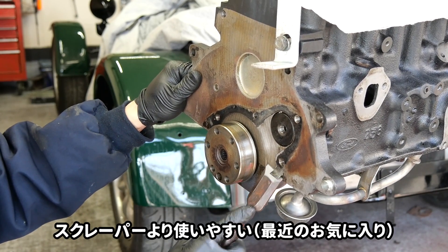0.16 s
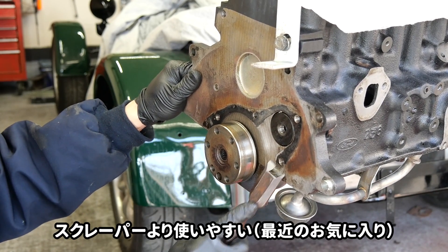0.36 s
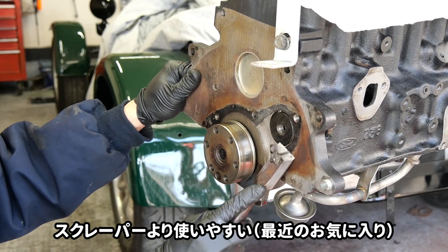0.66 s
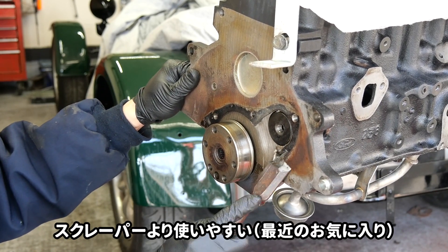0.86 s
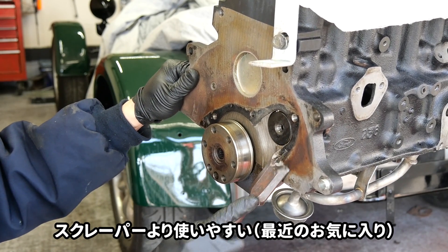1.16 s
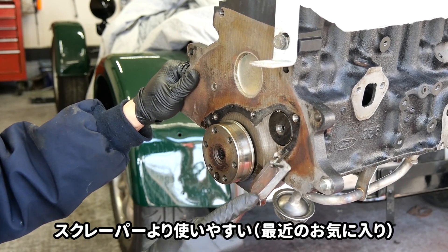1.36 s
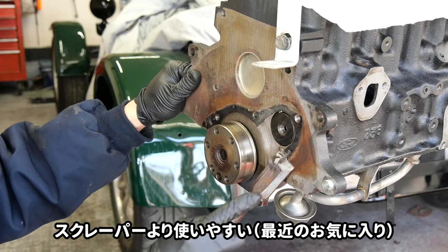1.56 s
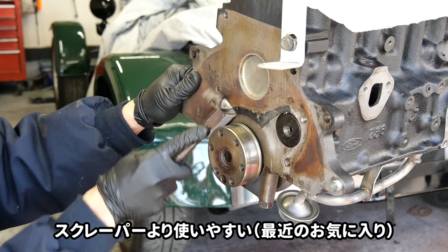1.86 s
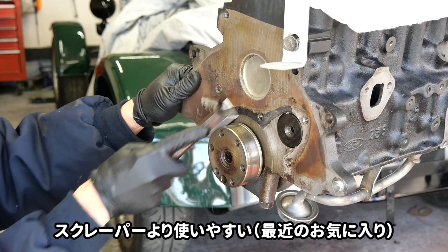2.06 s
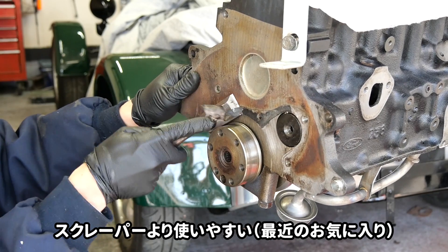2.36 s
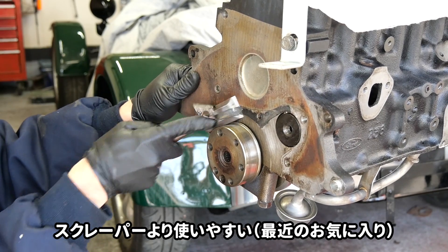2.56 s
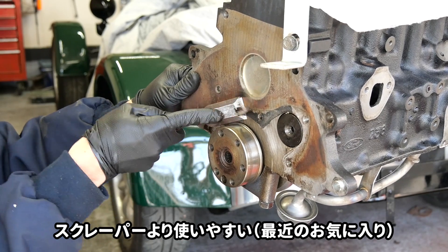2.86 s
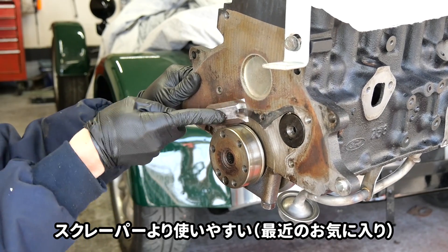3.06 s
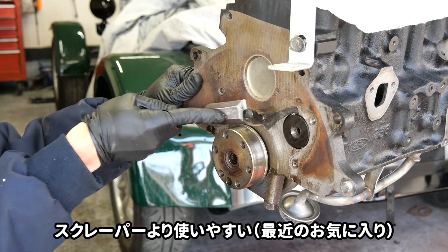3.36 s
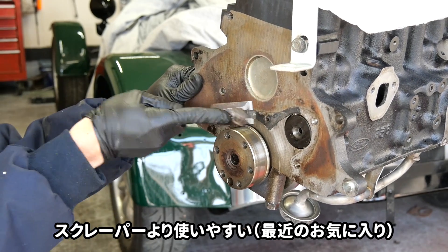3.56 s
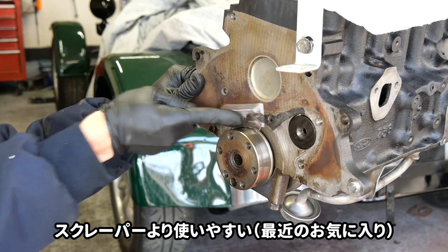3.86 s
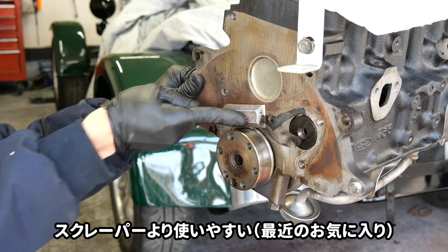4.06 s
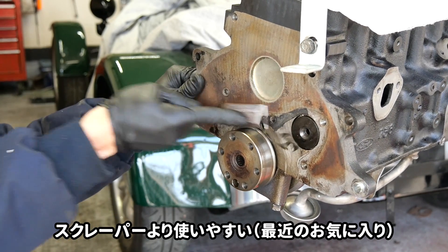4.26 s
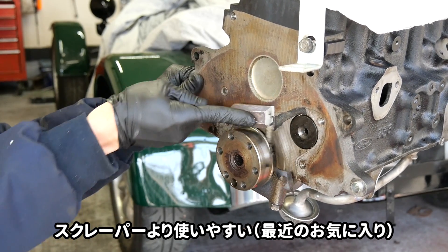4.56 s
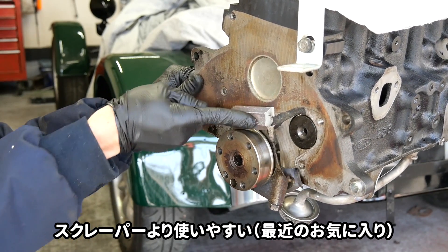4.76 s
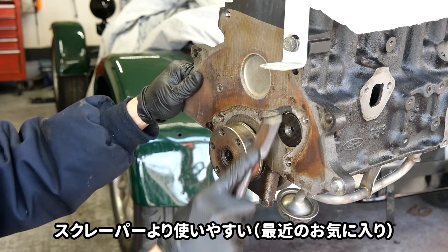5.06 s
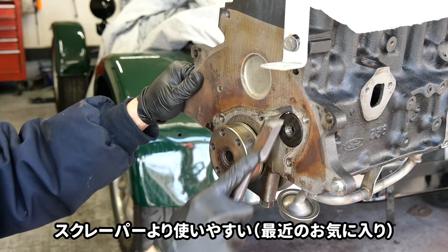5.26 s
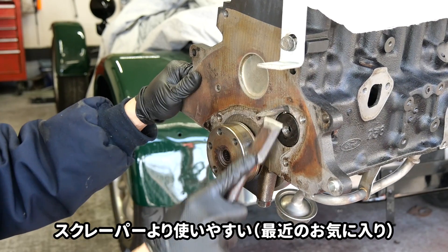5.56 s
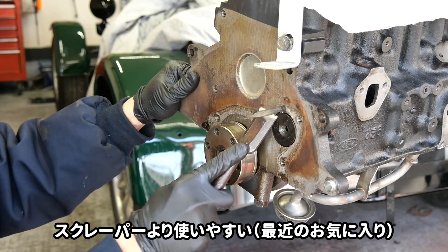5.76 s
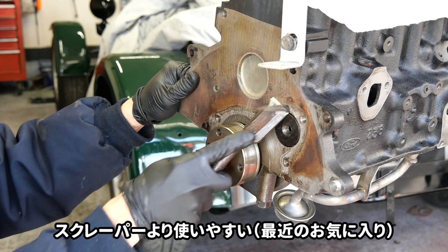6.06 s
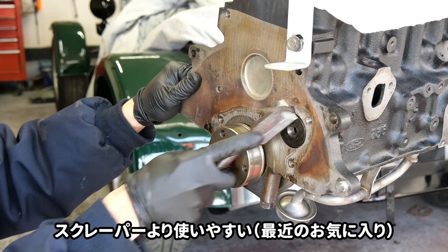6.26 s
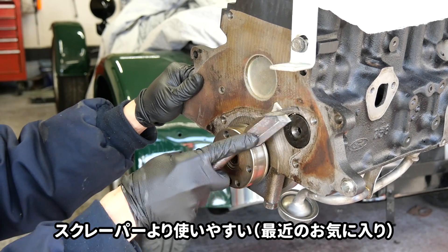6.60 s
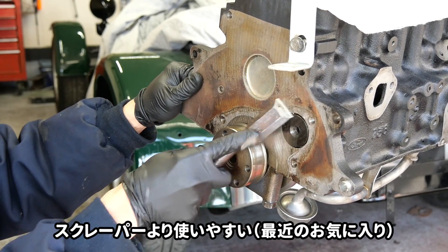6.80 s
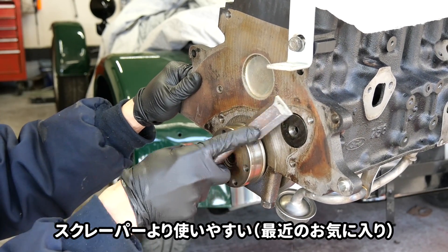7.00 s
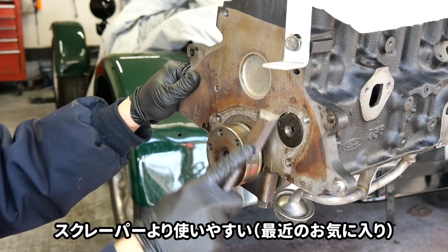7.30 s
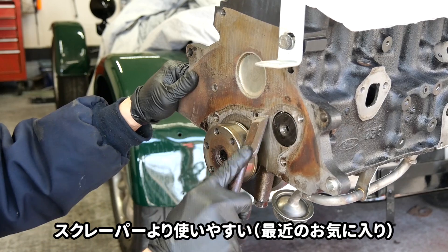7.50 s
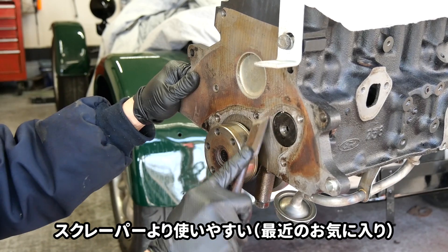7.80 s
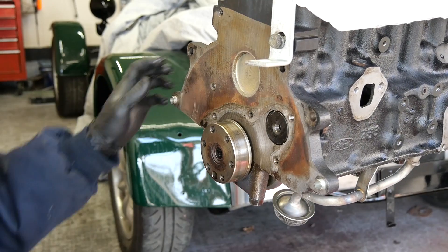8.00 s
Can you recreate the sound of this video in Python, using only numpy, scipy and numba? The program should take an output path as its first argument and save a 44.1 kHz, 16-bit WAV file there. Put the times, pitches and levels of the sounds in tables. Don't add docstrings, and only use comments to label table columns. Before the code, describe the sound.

Close, gritty metal scraping in fast uneven strokes, the steel blade ringing drily and clacking on ridges, in a workshop with faint road noise.

```python
import sys
import numpy as np
from scipy import signal
from scipy.io import wavfile
from scipy.ndimage import uniform_filter1d
from numba import njit

SR = 44100
rng = np.random.default_rng(int(sys.argv[2]) if len(sys.argv) > 2 else 0)


def materialize(psi):
    bounded = np.clip(np.atleast_2d(psi).T, -1, 1)
    quanta = np.round(bounded * 32767).astype(np.int16)
    wavfile.write(sys.argv[1], SR, quanta)


def gain_from_db(level_db):
    decades = np.asarray(level_db, float) / 20
    return 10 ** decades


N = 358797
T = np.arange(N) / SR

# time in seconds, level in dB.
ROAD_LEVEL = [
    (0.0, -46.3),
    (1.72, -46),
    (1.9, -51.5),
    (4.44, -52),
    (4.87, -53),
    (5.55, -50),
    (5.91, -51.5),
    (7.02, -50.5),
    (7.75, -53),
    (8.14, -44.5),
]
# frequency in Hz, density in dB per Hz.
ROAD_SPECTRUM = [(30, -36), (50, -22.5), (70, -26.5), (120, -23), (230, -16.5), (600, -12.5), (720, -9.5),
                 (900, -2), (1150, -17), (1700, -16), (3300, -18.5), (7000, -30), (12000, -37),
                 (16000, -50)]
# time in seconds, level in dB.
MOTOR_LEVEL = [
    (0, -82),
    (5.0, -80),
    (5.35, -64.5),
    (6.0, -66),
    (7.0, -69),
    (7.6, -70),
    (8.1, -74),
]
# time in seconds, peak in dB, centre in Hz, ring in dB over the peak.
FLAKES = [(0.0578, -37, 8200, -10), (0.161, -38, 12300, -14), (0.3481, -33, 9350, -12),
          (0.5506, -36.5, 10100, -9), (0.6519, -31, 11800, -22), (1.5805, -32.5, 9200, -12),
          (1.727, -30, 8150, -20), (2.355, -40, 10100, -12.5), (3.8262, -40, 12600, -18),
          (4.5121, -47, 9280, -8), (4.7331, -45, 9270, -17), (4.8883, -44, 10200, -17),
          (5.008, -42, 9160, -18), (5.1766, -38, 12400, -22), (5.1991, -40, 9300, -10),
          (5.3996, -40, 10100, -6), (5.4789, -45, 12100, -12), (5.6047, -46, 9400, -8),
          (6.6024, -38, 9330, -13), (6.9162, -51, 12000, -18), (7.6765, -47, 9200, -18),
          (7.8481, -47, 10200, -18)]
# time in seconds, peak in dB, blade mode in Hz.
CATCHES = [(0.0691, -21, 3640), (0.2602, -17, 3570), (0.4533, -20, 3600), (0.615, -21, 3670),
           (0.812, -19, 3260), (0.8424, -22, 3240), (1.0305, -21, 3500), (1.2455, -23, 3510),
           (1.4645, -23, 3460), (1.5139, -21, 3410), (2.6208, -20, 3380), (2.7515, -19, 3380),
           (2.7665, -16, 3550), (2.8418, -14, 3460), (2.8468, -11, 3560), (2.8724, -9, 3410),
           (3.0628, -23, 3360), (3.5053, -19, 3650), (3.5208, -15, 3810), (3.8366, -20, 3590),
           (3.9603, -18, 3500), (4.0441, -22, 3610), (4.2486, -20, 3640), (4.2837, -18, 3120),
           (5.3004, -18, 3240), (5.3622, -24, 3260), (5.5214, -19, 3280), (5.5334, -21, 3480),
           (7.2674, -28, 2990), (7.3018, -27, 2910), (7.3934, -21, 3250), (7.5677, -24, 3360),
           (7.7622, -27, 3460)]
# time in seconds, peak in dB, centre in Hz, ting in dB.
KNOCKS = [(0.6873, -18, 3430, -26), (0.9218, -24, 3640, -30), (1.1378, -14, 3430, -31),
          (1.3314, -17, 3300, -29), (1.7459, -17, 3290, -26), (1.8267, -22, 3570, -35),
          (1.8896, -6, 3630, -37), (2.1465, -10, 2700, -29), (2.9746, -20, 3460, -38),
          (3.1822, -22, 3850, -32), (3.2954, -6, 4080, -21), (3.7125, -12, 3850, -34),
          (3.9315, -3, 4010, -22), (4.141, -14, 3890, -30), (4.3355, -3, 3760, -18),
          (4.5391, -13, 3780, -30), (4.7501, -18, 3820, -33), (5.0789, -18, 3310, -36),
          (5.2579, -31, 3400, -24), (5.2879, -7, 3220, -38), (5.5578, -12, 3290, -41),
          (5.689, -11, 2990, -40), (6.346, -16, 4280, -28), (6.548, -9, 4250, -38),
          (6.7361, -11, 3290, -36), (6.9361, -17, 3470, -29), (7.0184, -22, 3530, -27),
          (7.3664, -21, 3220, -29), (7.3741, -10, 2930, -34), (7.4784, -18, 3900, -47)]
# time in seconds, peak in dB, pitch as a ratio.
TAPS = [(1.89, -30, 1.1), (2.148, -27, 1.03), (2.646, -32, 1.05), (3.294, -34.5, 0.96), (4.283, -29, 1.5),
        (4.335, -36, 0.9), (4.481, -33, 1.5), (4.54, -30.5, 1.06), (4.749, -32, 0.97), (5.079, -29, 1.04),
        (5.287, -20.5, 1.02), (5.559, -25, 1.05), (5.689, -36, 1.09), (6.547, -34, 0.96),
        (6.738, -34, 0.97), (7.375, -34, 0.98), (7.479, -29, 1.02)]
# time in seconds, peak in dB.
JOLTS = [
    (3.714, -43),
    (3.932, -35.5),
    (4.336, -36),
    (5.289, -42),
]
# frequency in Hz, width in Hz, level in dB.
CASTING = [(832, 120, 5.5), (1027, 86, 6.5), (1170, 400, -4), (1440, 250, 2)]
# frequency in Hz, width in Hz, level in dB.
EDGE = [(6400, 600, -1), (8050, 600, -5.5), (9300, 400, -10), (9280, 50, -15), (11420, 70, -17),
        (12120, 90, -13), (10400, 1000, -11), (11500, 800, -9), (12200, 1100, -2.5), (13300, 1200, -8),
        (14700, 1800, -15), (7500, 5000, -7)]
# multiple of the blade mode as a ratio, width in Hz, level in dB.
BLADE = [(1, 283, 8.5), (.96, 160, -8), (1.07, 120, -3.5), (.83, 370, -10.5), (1.2, 267, -3.5),
         (1.1, 2740, -9.5)]
# time in seconds, blade mode in Hz, shank mode in Hz.
GRIP = [
    [(0.0, 3620, 1700), (0.444, 3650, 1770), (0.798, 3320, 1460), (0.938, 3390, 1610), (1.026, 3470, 1470),
     (1.14, 3420, 1680), (1.352, 3430, 1600), (1.95, 3530, 1720)],
    [(1.96, 3600, 1670), (2.028, 3350, 1520), (2.168, 3600, 1620), (2.274, 3440, 1550), (2.834, 3480, 1520),
     (2.964, 3470, 1580), (3.024, 3360, 1460), (3.15, 3440, 1600)],
    [(3.16, 3650, 1710), (3.216, 3390, 1590), (3.306, 3790, 1850), (3.408, 3490, 1570), (3.732, 3810, 1750),
     (3.872, 3590, 1560), (3.95, 3780, 1780), (4.1, 3520, 1510)],
    [(4.11, 3660, 1520), (4.166, 3760, 1690), (4.292, 3340, 1500), (4.322, 3770, 1560), (4.386, 3430, 1680),
     (4.486, 3620, 1500), (4.756, 3620, 1620), (4.9, 3380, 1540)],
    [(4.95, 3410, 1540), (5.074, 3220, 1510), (5.186, 3580, 1680), (5.294, 3270, 1560), (5.382, 3570, 1770),
     (5.862, 3260, 1530), (5.906, 3520, 1810), (6.1, 3620, 1670)],
    [(6.11, 3600, 1760), (6.258, 3180, 1420), (6.324, 3550, 1760), (6.488, 3370, 1490), (6.518, 3170, 1710),
     (6.592, 3420, 1680), (7.066, 3430, 1570), (7.2, 3570, 1610)],
    [(7.21, 3160, 1560), (7.226, 2960, 1530), (7.394, 3010, 1770), (7.442, 3210, 1470), (7.472, 3490, 1610),
     (7.746, 3480, 1580), (7.9, 3460, 1740), (8.1, 3380, 1520)],
]
# time in seconds, then bite, casting contact, shank
# and edge hiss, all in dB.
ANGLE = [(0.0, -18, -23, -10.5, -16), (0.45, -11, -14.5, -8, -9), (0.7, -19, -14, -11, -15),
         (0.95, -21, -12.5, -11, -15.5), (1.5, -19, -15, -12, -13), (1.87, -22, -21, -16, -21),
         (2.1, -13.5, -10.5, -10, -14), (2.6, -18, -12.5, -6, -14), (2.86, -17, -12, -6, -12),
         (3.1, -21, -15, -12, -20), (3.3, -10.5, -11, -8.5, -17), (3.75, -19, -12, -8.5, -13),
         (4.2, -17, -16.5, -12, -13.5), (4.8, -20, -12, -12, -15), (5.3, -11.5, -8, -14.5, -13),
         (5.4, -4.5, -8.5, -11.5, -11.5), (5.55, -15, -13.5, -14, -14), (5.8, -15, -11.5, -16, -21),
         (5.94, -4, -15.5, -11, -17), (6.25, -8, -10, -8, -16), (6.45, -9.5, -10, -8, -13),
         (6.75, -13, -15, -7, -18.5), (7.0, -17, -14, -8, -21), (7.14, -13, -10, -6.5, -15),
         (7.24, -20.5, -22, -19.5, -20), (7.9, -27, -23, -20, -23), (8.1, -4, -10, -16, -11)]
# peak time in
# seconds, force in dB, rise in ms, fall in ms.
STROKES = [(0.014, -35.5, 33, 15), (0.074, -27.5, 9.6, 7.9), (0.203, -30.5, 26, 32),
           (0.274, -26.5, 15, 16), (0.402, -41.0, 29, 14), (0.458, -34.5, 11.6, 38),
           (0.619, -32.5, 14, 9.8), (0.692, -29.5, 19, 34), (0.836, -29.0, 25, 13.4),
           (0.927, -28.5, 9.2, 14.6), (1.036, -31.0, 13, 14.4), (1.145, -26.0, 17.3, 11.5),
           (1.256, -29.5, 15.5, 12.7), (1.335, -24.0, 11, 21), (1.537, -32.0, 21, 17),
           (1.649, -32.0, 18, 29), (1.741, -26.0, 29, 15), (1.833, -23.5, 7.6, 27),
           (1.892, -24.0, 10, 45),
           (2.06, -33.0, 37, 22), (2.152, -33.0, 25, 36), (2.269, -35.0, 31, 44), (2.396, -37.0, 47, 25),
           (2.534, -35.0, 51, 24), (2.644, -31.0, 33, 17.6), (3.077, -31.5, 17, 14), (3.22, -30.0, 31, 33),
           (3.296, -29.0, 18, 34), (3.436, -34.0, 26, 19), (3.516, -27.0, 18, 13.6), (3.655, -38.0, 25, 11),
           (3.719, -34.5, 14.4, 23), (3.855, -30.5, 25.5, 34), (3.939, -31.5, 38, 46),
           (4.055, -40.0, 33, 25), (4.139, -26.5, 22, 14), (4.265, -28.5, 17.3, 38), (4.34, -29.0, 15, 49),
           (4.487, -34.0, 23, 23), (4.544, -27.0, 12, 16), (4.683, -43.0, 25, 21), (4.755, -28.0, 15, 20.6),
           (5.009, -57.0, 38, 20), (5.05, -41.5, 6, 34), (5.152, -32.0, 18.6, 13),
              (5.262, -39.5, 4.4, 33), (5.362, -37.5, 43, 27), (5.434, -41.5, 63, 15),
              (5.525, -32.5, 36, 18), (5.84, -36.0, 58, 9.2), (5.939, -38.0, 31.5, 10),
              (6.064, -43.0, 31, 8.9), (6.141, -34.5, 28.4, 8.4), (6.236, -36.5, 12, 29),
              (6.346, -30.5, 19.3, 8.7), (6.437, -39.5, 12, 43), (6.642, -39.0, 24, 36),
              (6.858, -25.5, 30, 11), (6.938, -27.0, 12.6, 18), (6.977, -27.0, 18, 11),
              (7.024, -29.5, 7, 64), (7.16, -34.0, 45, 22), (7.259, -36.5, 29, 34), (7.31, -34.0, 18, 41),
              (7.572, -33.0, 34, 16), (7.686, -43.0, 16, 32), (7.775, -35.0, 16.4, 21),
              (7.913, -34.5, 21, 12.6), (8.125, -48.5, 86, 18)]
# peak time in seconds, force in dB,
# rise in ms, fall in ms.
BURIED = [(1.47, -36.5, 23, 13), (2.781, -22.0, 31.5, 14), (2.846, -21.5, 10, 12), (2.861, -20.5, 9, 9),
          (2.875, -23.5, 8, 7), (3.008, -37.5, 36, 12), (3.188, -36.5, 4, 33), (5.082, -38.5, 22, 21),
          (5.292, -28.0, 3, 14), (5.56, -31.0, 52, 12), (5.69, -28.5, 20, 17), (6.545, -30.0, 18, 7),
          (6.739, -23.5, 13, 12.3), (7.376, -36.0, 20, 56), (7.483, -38.5, 19, 24)]
# frequency in Hz, limit in dB.
MASKED = [(4000, -62), (7000, -40.5), (10000, -44), (12500, -47), (15500, -56)]
# frequency in Hz, level in dB.
SPLIT = [(60, -13), (200, -10), (700, -18), (2400, -22.5), (4400, -23), (8000, -8.5), (15000, -10.5)]

MOTOR_HZ = 437
ROOM_T60_S, ROOM_DB = 0.35, -9.5
ROOM_SHANK_CUT = 0.5
PART_RING_HZ, PART_RING_WIDTH_HZ = 9280, 4.8
CATCH_DB = -7
KNOCK_BUILD_MS, TING_PER_DB = 0.71, 1.5
KNOCK_WIDENS = 0.35
USUAL_FORCE_DB = -30
BURIED_EDGE_DB, BURIED_SHANK_DB = -8.5, 2.5
SHANK_PER_DB, EDGE_PER_DB = -0.38, -0.04
SHANK_SWELL = 0.75
STIFFEN_PER_DB = 0.002
CRUMBS_PER_S = 180
SPLIT_FRAMES, SPLIT_BANDS = 0.3, 0.2


@njit
def svf(x, hz, width):
    y, b, l, g, k, last = np.empty(len(x)), 0., 0., 0., 0., 0.
    for i in range(len(x)):
        if abs(hz[i] - last) > 1:
            g, k, last = np.tan(np.pi * hz[i] / SR), width / hz[i], hz[i]
        v = (b + g * (x[i] - l)) / (1 + g * (g + k))
        b, l, y[i] = 2 * v - b, l + 2 * g * v, k * v
    return y


def unit(x):
    return x / np.sqrt(np.mean(x ** 2))


def band(x, hz, width):
    centre = np.clip(hz + np.zeros(len(x)), 20, 19000)
    return svf(x + 1e-18, centre, max(1. * width, 1.))


def walk(rate):
    hold = int(SR / rate)
    steps = np.repeat(rng.standard_normal(N // hold + 1), hold)
    return unit(uniform_filter1d(uniform_filter1d(steps, hold), hold)[:N])


def modes(x, table, base, patchy_db=0):
    out = 0
    for k, (ratio, width, db) in enumerate(table):
        hz = ratio * base
        sway = patchy_db * walk(14) if patchy_db else 0
        ringing = band(band(x, hz, width), hz, 3 * width) / np.sqrt(width)
        out = out + (-1) ** k * gain_from_db(db + sway) * ringing
    return out


def crack(noise, decay_ms):
    return noise * np.exp(-1000 * np.arange(len(noise)) / SR / decay_ms)


def add(out, s, x, db):
    i = int(s * SR)
    out[i:i + len(x)] += (gain_from_db(db) * x / np.abs(x).max())[:N - i]


def road():
    tyres = 0
    table_hz, per_hz_db = np.transpose(ROAD_SPECTRUM)
    for hz in 30 * 2 ** np.arange(0, 9.1, 1 / 4):
        db = np.interp(np.log(hz), np.log(table_hz), per_hz_db) + 1.3 * walk(4.6)
        noise = rng.standard_normal(N)
        tyres = tyres + gain_from_db(db) * band(band(noise, hz, hz / 4), hz, hz / 4)
    motor_db = np.interp(T, *np.transpose(MOTOR_LEVEL)) + 1.1 * walk(4.04)
    motor = gain_from_db(motor_db) * np.sin(2 * np.pi * MOTOR_HZ * T)
    return unit(tyres) * gain_from_db(np.interp(T, *np.transpose(ROAD_LEVEL))) + motor


def room(x):
    t = T[:SR // 2]
    noise = rng.standard_normal(len(t)) * np.minimum(t / 0.008, 1)
    low = band(noise, 2900, 7000)
    low_fade = np.exp(-np.log(1000) * t / ROOM_T60_S)
    rest_fade = np.exp(-np.log(1000) * t / (0.86 * ROOM_T60_S))
    tail = low * low_fade + (noise - low) * rest_fade
    sent = x - ROOM_SHANK_CUT * band(x, 1550, 900)
    return gain_from_db(ROOM_DB) * signal.fftconvolve(sent, tail / np.sqrt(np.sum(tail ** 2)))[:N]


def flakes():
    out = np.zeros(N)
    chance = rng.standard_normal((len(FLAKES), 9000))
    for (s, db, hz, ring_db), noise in zip(FLAKES, chance):
        add(out, s, band(band(crack(noise, 1.0), hz, 6000), hz, 9000), db)
        add(out, s, band(crack(noise, 4.6), hz, 56), db + ring_db)
    add(out, 4.512, band(crack(chance[0], 7.7), PART_RING_HZ, PART_RING_WIDTH_HZ), -51)
    return out


def catches():
    out = np.zeros(N)
    chance = rng.standard_normal((len(CATCHES), 2000))
    for (s, db, hz), noise in zip(CATCHES, chance):
        pluck = crack(noise, 0.8)
        add(out, s, band(band(pluck, hz, 420), hz, 1400), db + CATCH_DB)
        add(out, s, band(band(pluck, hz, 3500), hz, 5000), db - 14)
    return out


def knocks():
    out = np.zeros(N)
    build = 1 - np.exp(-(1000 * T[:4000] / KNOCK_BUILD_MS) ** 2)
    chance = rng.standard_normal((len(KNOCKS + TAPS), 4000))
    for (s, db, hz, ting_db), noise in zip(KNOCKS, chance * build):
        hit = crack(noise, 1.12) + gain_from_db(-17.5) * crack(noise, 4.1)
        width = 3600 * gain_from_db(KNOCK_WIDENS * (db + 6))
        hit = band(band(band(hit, hz, width), hz, width), hz, 4500)
        add(out, s, band(hit, 2000, 4200), db - 0.5)
        ting = modes(crack(noise, 0.62), EDGE, 0.98)
        add(out, s, ting, db + TING_PER_DB * (ting_db + 29.5) - 25.5)
    for (s, db, pitch), noise in zip(TAPS, chance[::-1]):
        add(out, s, modes(crack(noise, 1.07), CASTING, pitch), db - 0.5)
    for s, db in JOLTS:
        add(out, s, band(crack(np.ones(4000), 0.25), 340, 480), db)
    return out


def grit(share, spread_db, chatter_db, crumb_db):
    size = gain_from_db(spread_db * np.minimum(rng.exponential(size=N), 4))
    caught = rng.random(N) < share
    grains = size * caught * np.sign(rng.standard_normal(N))
    rubbing = rng.standard_normal(N)
    crumb_size = gain_from_db(crumb_db + 3 * rng.standard_normal(N))
    crumbs = crumb_size * (rng.random(N) < CRUMBS_PER_S / SR)
    return unit((grains + rubbing + crumbs) * gain_from_db(chatter_db * walk(160)))


def stroke_forces():
    power = np.zeros((3, N))
    steepness = 8 * np.array([[1], [SHANK_SWELL], [1]])
    for k, (s, db, rise_ms, fall_ms) in enumerate(BURIED + STROKES):
        span = slice(max(int((s - 0.3) * SR), 0), int((s + 0.3) * SR))
        late_ms = 1000 * (T[span] - s)
        swell = db - steepness * np.abs(late_ms / np.where(late_ms < 0, rise_ms, fall_ms)) ** 1.78
        hard_db = db - USUAL_FORCE_DB
        buried = k < len(BURIED)
        shank_db = SHANK_PER_DB * hard_db + buried * BURIED_SHANK_DB
        edge_db = EDGE_PER_DB * hard_db + buried * BURIED_EDGE_DB
        power[:, span] += gain_from_db(swell + np.array([[0], [shank_db], [edge_db]])) ** 2
    return np.sqrt(power)


def scrape(blade_hz, shank_hz, bite_db, contact_db, shank_db, hiss_db):
    blade, shank, hiss = stroke_forces()
    blade_db = 20 * np.log10(uniform_filter1d(blade, 2000) + 1e-9)
    pressed_db = np.clip(blade_db - USUAL_FORCE_DB, -15, 5)
    stiff = 1 + STIFFEN_PER_DB * (pressed_db + 5)
    coarse = grit(0.05, 2.9, 2.2, crumb_db=19)
    fine = grit(0.1, 1.5, 2.85, crumb_db=17)

    def steep(hz, width):
        return lambda x: band(band(x, hz, width), hz, 1.17 * width)

    def ring_blade(x):
        return modes(x, BLADE, blade_hz * stiff, patchy_db=2.0)

    def ring_edge(x):
        return modes(x, EDGE, 1 + 0.005 * walk(6.7), patchy_db=4)

    def steady(x):
        return np.sqrt(uniform_filter1d(uniform_filter1d(x ** 2, size=1000), size=1000))

    parts = [(coarse, blade, ring_blade),
             (coarse, shank * gain_from_db(shank_db), steep(shank_hz * stiff, 340)),
             (coarse, blade * gain_from_db(contact_db), steep(2344, 430)),
             (fine, blade * gain_from_db(bite_db), steep(4640, 1360)),
             (fine, hiss * gain_from_db(hiss_db), ring_edge)]
    return sum(ring(x * force) / steady(ring(x)) for x, force, ring in parts)


def scene():
    hand = []
    for table in (np.concatenate(GRIP), ANGLE):
        s, *columns = np.transpose(table)
        hand += [np.interp(T, s, column) for column in columns]
    tool = scrape(*hand) + knocks() + flakes() + catches()
    return np.tile(tool + room(tool) + road(), (2, 1))


def low_pass(x):
    return signal.sosfilt(signal.butter(12, 16500, fs=SR, output="sos"), x)


def record(dry):
    hz, _, z = signal.stft(dry[0], SR, nperseg=2048)
    hz, z = hz[:1024, None], z[:1024]

    def read(table):
        table_hz, db = np.transpose(table)
        return np.interp(np.log(hz + 1), np.log(table_hz), db)

    power = np.repeat((np.abs(z) ** 2).reshape(128, 8, -1).sum(1), 8, axis=0)
    luck_db = 8 * np.repeat(rng.standard_normal((128, z.shape[1])), 8, axis=0)
    z = z * (power > power.sum(0) / 8 * gain_from_db(read(MASKED) + luck_db) ** 2)
    frame = rng.random(z.shape[1]) < SPLIT_FRAMES
    patch = rng.random((32, z.shape[1])) < np.where(frame, 0.75, SPLIT_BANDS)
    phase = np.exp(2j * np.pi * rng.random(z.shape))
    side = z * np.repeat(patch, 32, axis=0) * gain_from_db(read(SPLIT)) * phase
    mix = signal.istft(np.array([z + side, z - side]), SR, nperseg=2048, nfft=2048)[1][:, :N]
    mix = signal.sosfilt(signal.ellip(8, 0.2, 60, 15780, fs=SR, output="sos"), mix)
    return low_pass(mix)


dry = scene()
out = record(dry)
materialize(out)
```